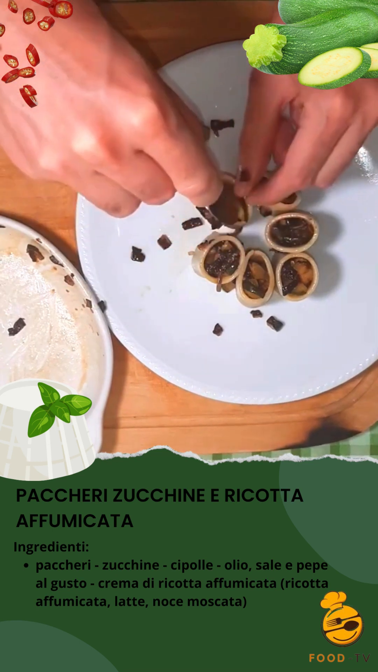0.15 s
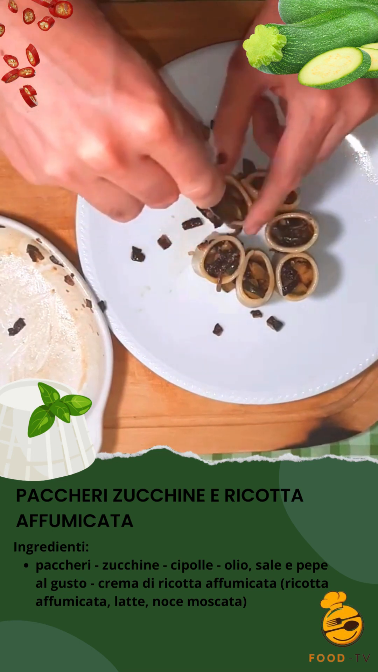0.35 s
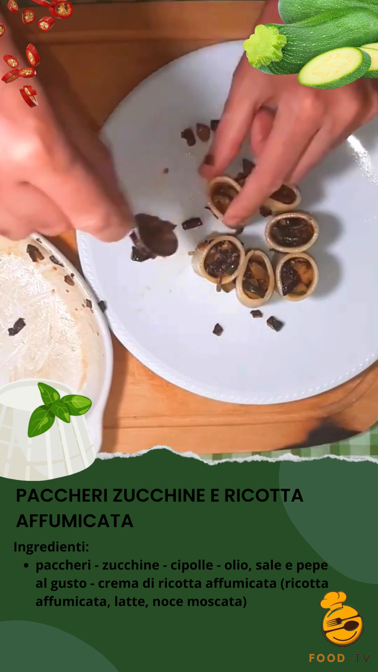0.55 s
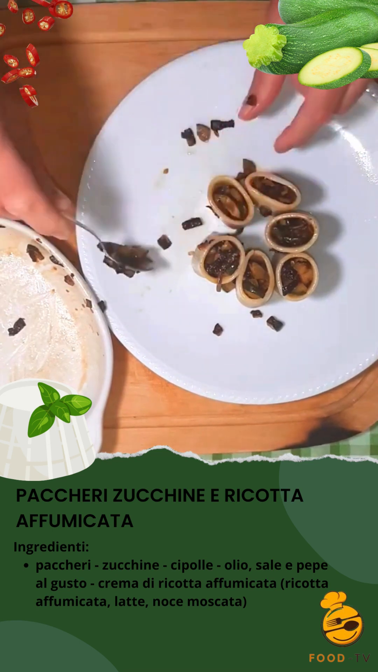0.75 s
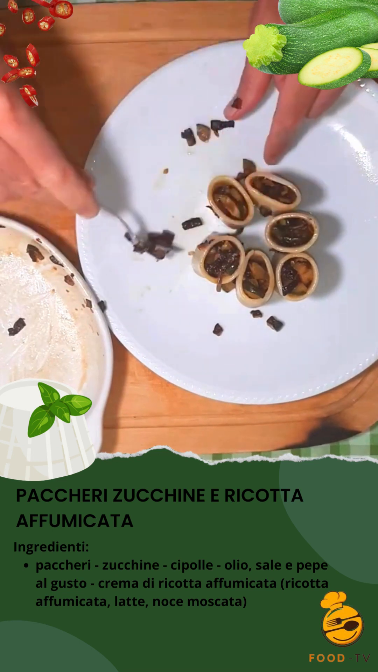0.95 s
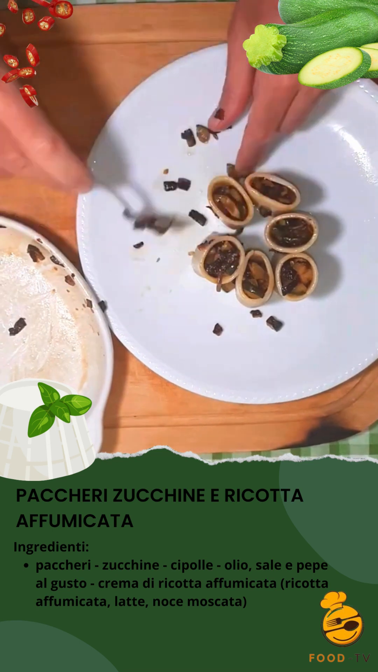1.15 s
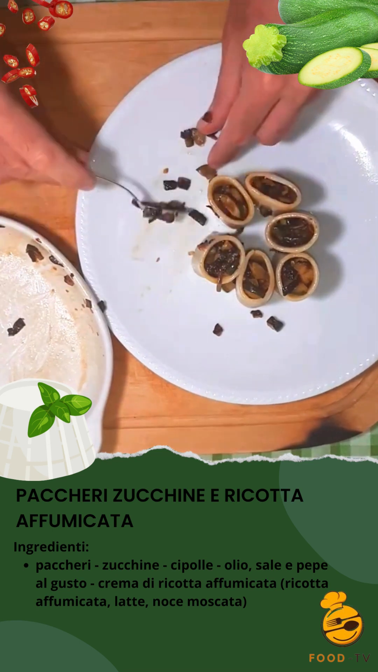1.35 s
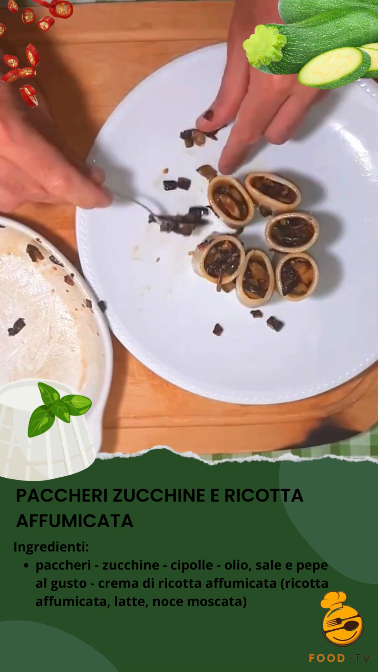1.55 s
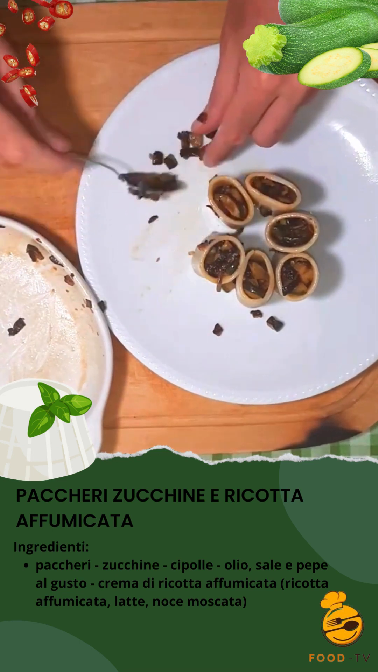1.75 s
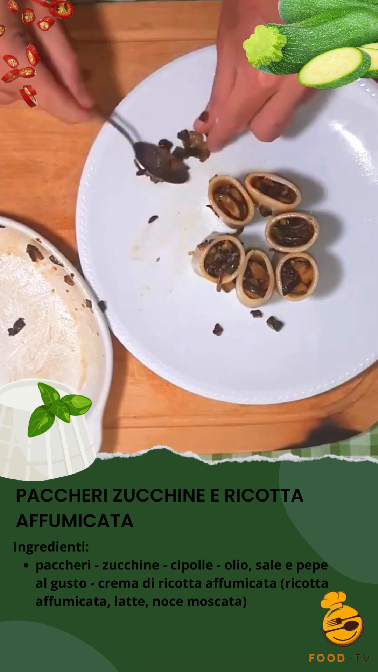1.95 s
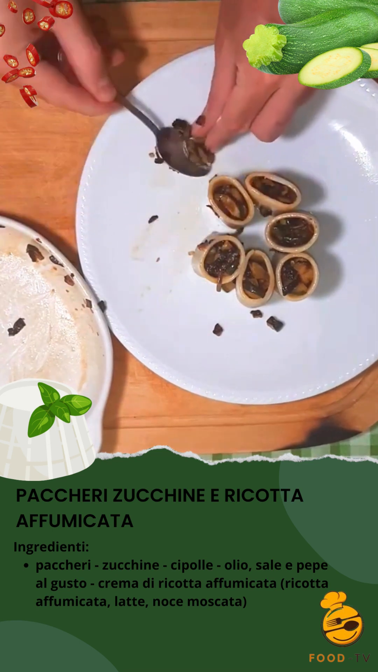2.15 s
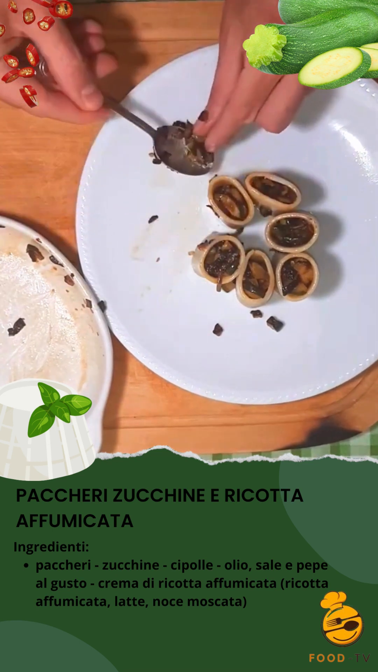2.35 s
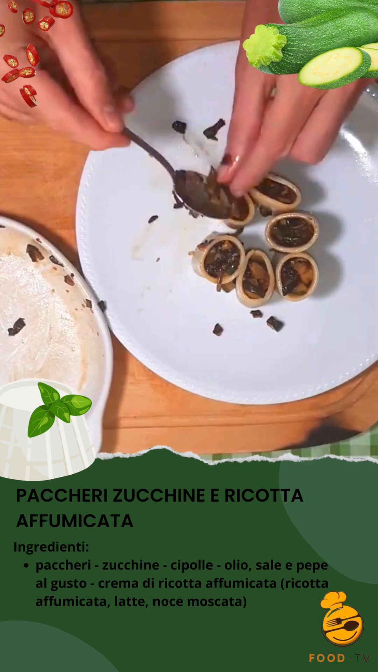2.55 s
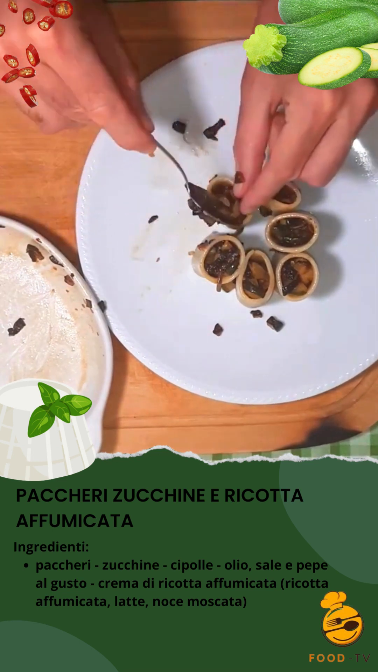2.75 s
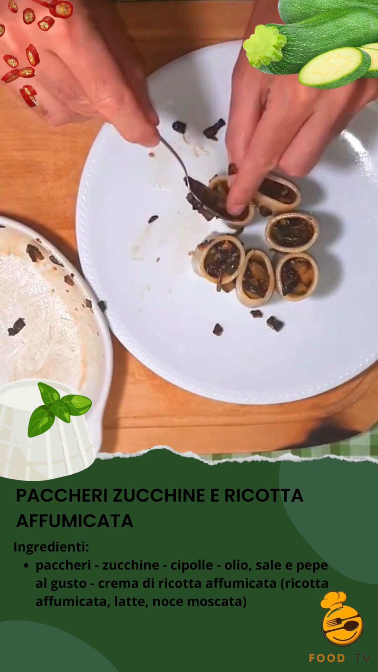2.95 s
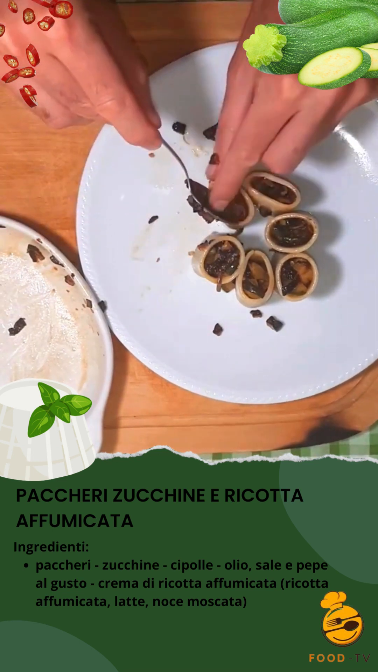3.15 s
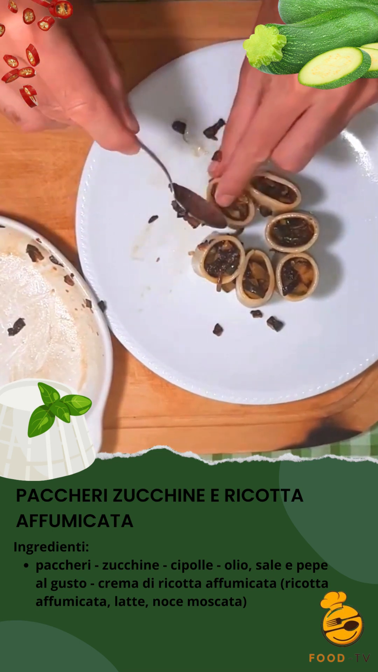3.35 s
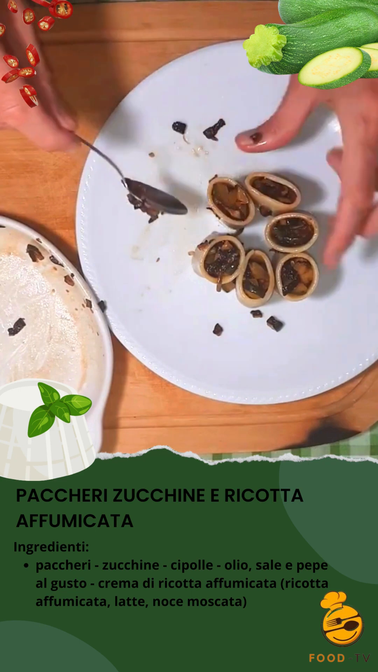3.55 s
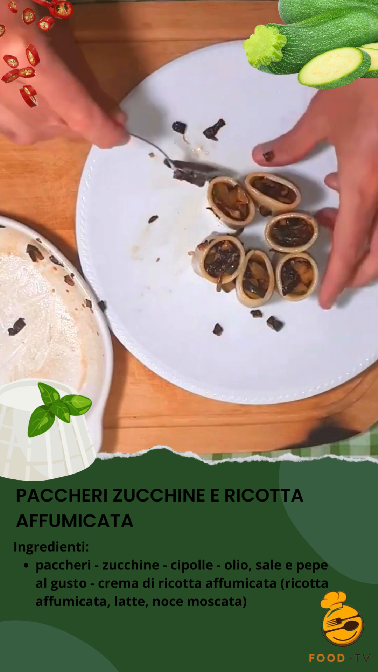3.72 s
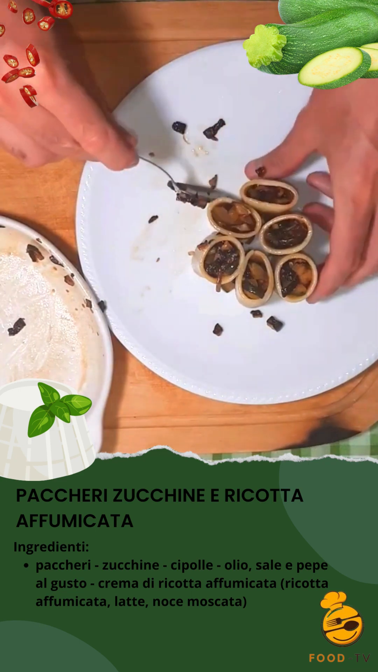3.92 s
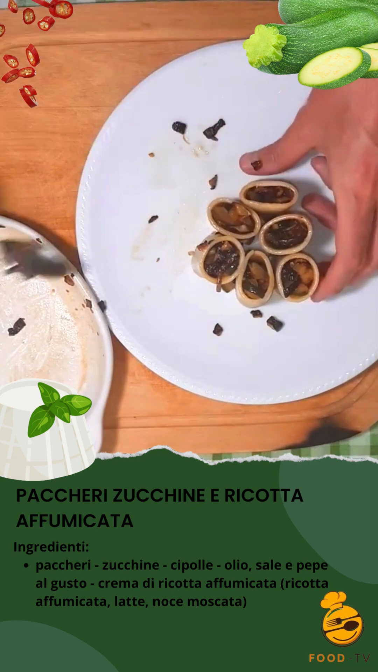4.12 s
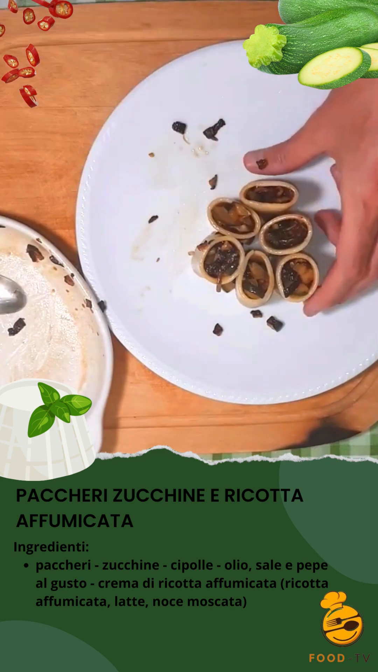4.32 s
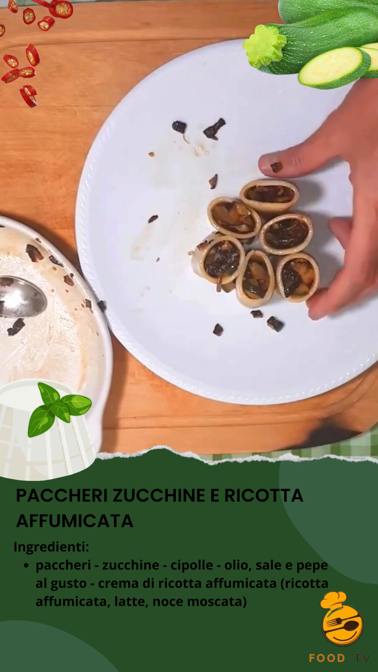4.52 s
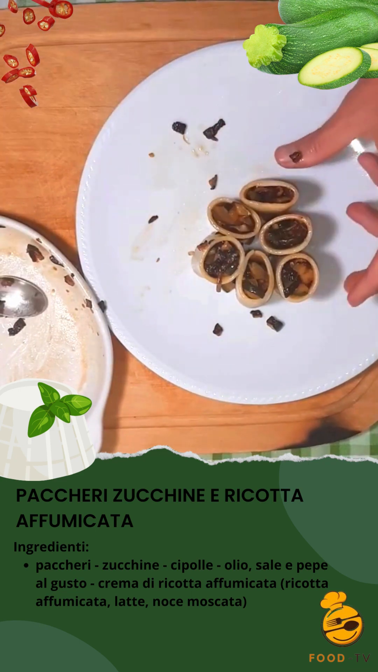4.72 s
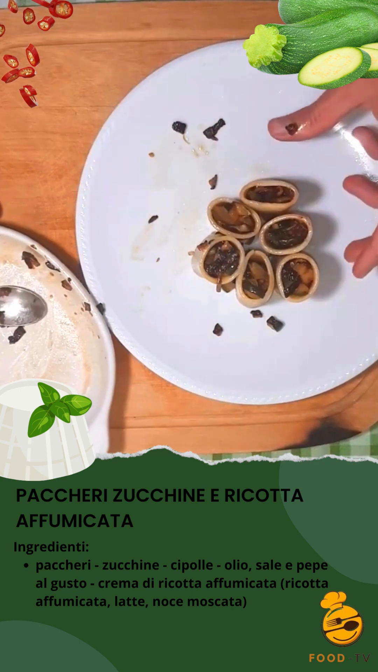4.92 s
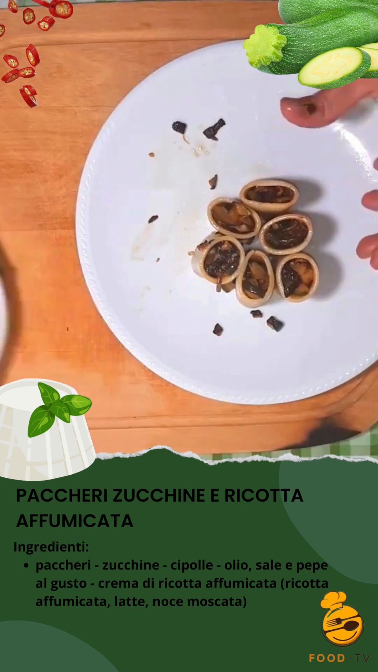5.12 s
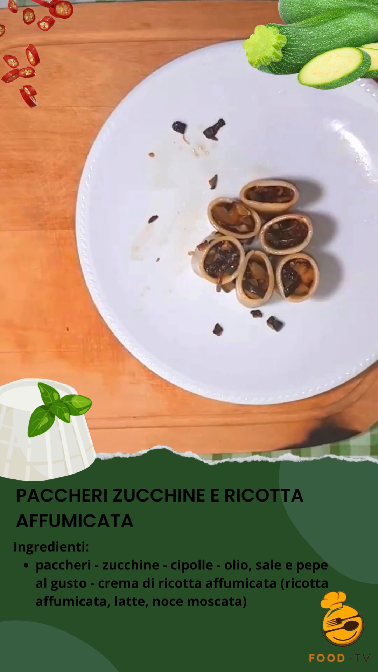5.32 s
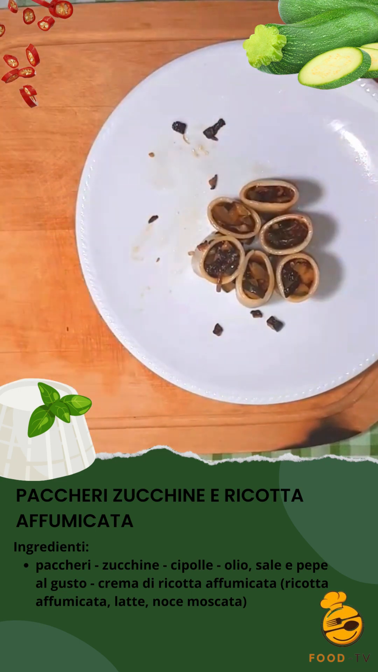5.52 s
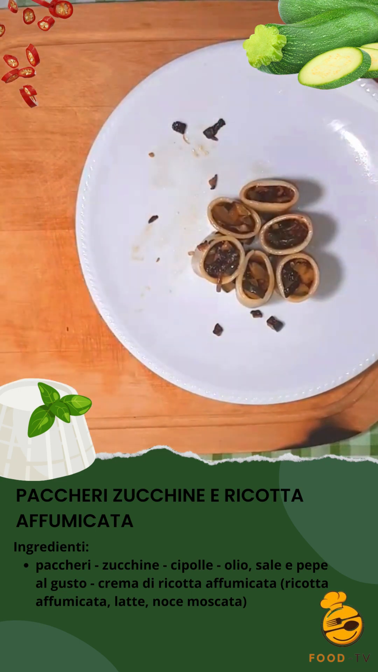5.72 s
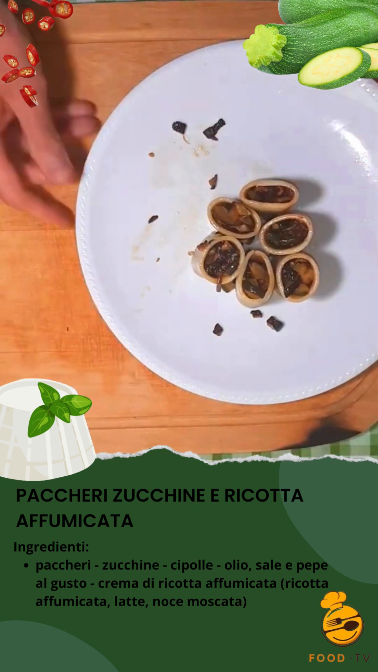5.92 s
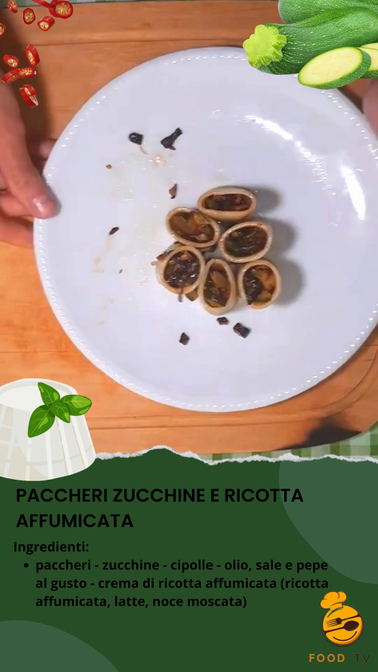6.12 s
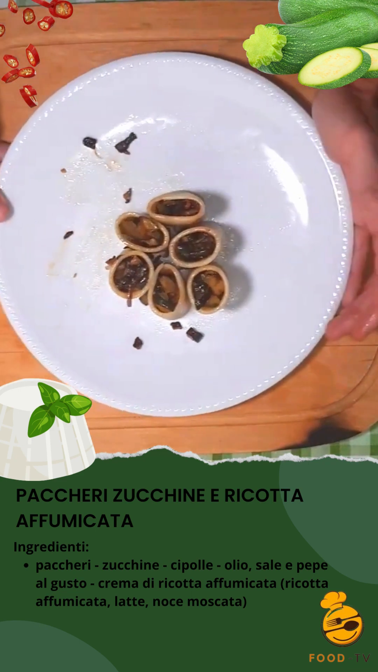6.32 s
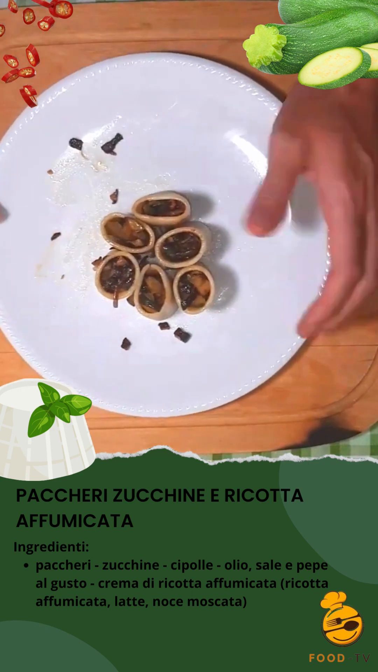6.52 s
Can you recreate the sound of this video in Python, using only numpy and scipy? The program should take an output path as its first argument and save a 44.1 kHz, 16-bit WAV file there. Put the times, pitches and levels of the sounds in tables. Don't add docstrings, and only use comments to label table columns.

```python
import sys
import numpy as np
from scipy import signal
from scipy.fft import rfft, irfft, next_fast_len
from scipy.io import wavfile
from scipy.ndimage import uniform_filter1d

SR = 44100
rng = np.random.default_rng(int(sys.argv[2]) if len(sys.argv) > 2 else 0)


def boost(x):
    u = np.asarray(x, float) / 20
    return 10 ** u


def log_audio(samples):
    frames = np.atleast_2d(samples).T
    limited = np.clip(frames, -1, 1)
    pcm = np.round(limited * 32767).astype(np.int16)
    wavfile.write(sys.argv[1], SR, pcm)


N = 294279

# t/s, crack level/dB, crack t60/s, ring level/dB
TAPS = [
    (1.047, -24, 0.017, -2),
    (1.327, -12.5, 0.022, -2.5),
    (1.561, -14.5, 0.048, -2.5),
    (1.864, -19.5, 0.1, -3),
]
# f/Hz, t60/s, then level/dB for each of the four spots struck
PLATE_MODES = [(597, 0.18, -49, -43.5, -57, -48), (885, 0.12, -51.5, -38, -47, -41),
               (1168, 0.16, -54.5, -49.5, -61, -39.5), (1355, 0.21, -54, -35.5, -49.5, -37.5),
               (1630, 0.26, -57.5, -41, -52, -47), (1940, 0.082, -51, -41.5, -36, -43.5),
               (2160, 0.17, -61.5, -54, -44, -48), (2900, 0.2, -49, -38, -41, -41.5),
               (3930, 0.16, -63, -40.5, -51.5, -65), (4250, 0.082, -40.5, -48, -40, -65),
               (4940, 0.093, -69.5, -40, -59, -54), (5230, 0.14, -71, -37, -45, -39),
               (5760, 0.13, -59, -30, -50, -37.5), (3150, .12, -56, -62, -61, -62),
               (3595, 0.079, -59, -58, -71, -75), (4450, .12, -75.5, -52, -60, -70)]
SPOON_MODES = [(5850, 0.11, -46, -63, -42.5, -60), (6150, 0.17, -58, -37.5, -68, -55),
               (6570, 0.26, -61.5, -56, -42, -52), (6720, .15, -51, -44, -39, -44),
               (6770, 0.29, -66, -37, -41.5, -44.5), (7520, 0.26, -60.5, -43.5, -52, -45.5),
               (9180, 0.87, -67.5, -56, -60.5, -118), (9980, 0.22, -80.5, -59, -63.5, -53.5),
               (10930, 0.1, -57.5, -42.5, -52, -44.5), (11300, 0.27, -65.5, -52, -53, -49.5),
               (12130, 0.24, -81, -49, -109, -53.5), (13200, 0.2, -74.5, -54, -107, -60),
               (13610, 0.22, -72, -109, -54.5, -51), (14900, 0.2, -119, -120, -119, -57)]
DROP = [
    (4.374, -14.5, 0.35, -3),
]
# f/Hz, level/dB
CRACK = [(180, -50), (300, -11), (1390, -1.5), (2030, -12), (2400, -12.5), (2930, -4), (3350, -14.5),
         (5800, -4.5), (6960, -8.5), (8000, -38.5), (9300, -43), (10200, -30), (11300, -16.5), (14000, -36),
         (16000, -48)]


def plate_taps():
    out = np.zeros(N + SR)
    hz, t60, *spots = np.transpose(PLATE_MODES + SPOON_MODES)
    for (s, db, crack_t60, ring_db), spot_db in zip(TAPS, spots):
        add(out, s, hz, spot_db + ring_db + 5.0, t60, rough=0.45, punch=1.24, rocks=60)
    return out[:N] + cracks(TAPS, CRACK)


def plate_scrapes():
    # lifts at t/s, squeal level/dB, hiss level/dB, first pitch f/Hz, last pitch f/Hz
    scrapes = [
        (1.127, -40, -41, 1935, 1996),
        (1.449, -37, -41.5, 2191, 1910),
        (1.739, -40.5, -37.5, 2153, 1940),
        (1.93, -49, -40, 1955, 2047),
    ]
    # t/s, f/Hz, level/dB,
    # t60/s
    catches = [(1.07, 1950, -44, .08), (1.092, 1994, -37, 0.087), (1.352, 1360, -42, .2),
               (1.355, 2120, -37, .15), (1.393, 1995, -33, .1), (1.422, 1974, -39, 0.073),
               (1.445, 2856, -42, .08), (1.452, 1916, -38, .08), (1.475, 1920, -36, .08),
               (1.648, 2180, -30, .08), (1.652, 1946, -35, .08), (1.677, 1953, -25, 0.07),
               (1.697, 2847, -41.5, .15), (1.71, 1942, -31, 0.096), (1.885, 1355, -40, 0.41),
               (1.875, 2932, -44, 0.2), (4.92, 2108, -51, .36)]
    lands_s, squeal_rise_s, hiss_sag_db_s, lift_db_s = 0.012, 0.012, 72.5, 313
    hz, t60, *spots = np.transpose(PLATE_MODES + SPOON_MODES)

    def gap(f):
        return 1 - np.exp(-((f - 8650) / 1000) ** 4)

    hisses, load, pitch = 0, 0, []
    for (s, *_), spot_db, (lift, squeal_db, hiss_db, *ends_hz) in zip(TAPS, spots, scrapes):
        modes = [(c, 40 + 0.005 * c, db + 20 * np.log10(ring / 0.15))
                 for c, db, ring in zip(hz, spot_db, t60) if c > 800]
        start = s + lands_s
        gain = stroke(start, hiss_db, lands_s, lift_db_s, lift - start, hiss_sag_db_s)
        hisses = hisses + gain * grit(lambda f: resonant(modes)(f) * gap(f), spiky_db=7.0)
        start += squeal_rise_s
        load = load + stroke(start, squeal_db, squeal_rise_s, lift_db_s, max(lift - start, 0))
        pitch += zip([s, lift], ends_hz)
    turns = np.cumsum(np.interp(np.arange(N) / SR, *np.transpose(pitch))) / SR
    slips = knots(N, 200, rows=2)
    squeal = unit(np.imag((slips[0] + 1j * slips[1]) * np.exp(2j * np.pi * turns)))
    flares = pings(catches, rough=0.35, attack=0.0045)
    return boost(-4.5) * hisses + boost(-4.0) * load * squeal + flares


def dish_drop():
    dish_hz = [480, 570, 1270, 1640, 2220, 2928, 3342, 3399, 3470, 3560, 3820, 4010, 4140, 4430, 4865, 5142,
               5209, 5274, 5360, 5631, 5771, 6180, 6775, 7146, 7691, 8085, 8186, 8960, 9330, 9447, 10200,
               10906, 11410, 11831, 12150, 12413, 12930, 13960]
    # level/dB, t60/s
    dish_ring = [(-29, .25), (-25, .25), (-15, 0.25), (-27, 0.17), (-31.5, .15), (-21.5, 0.22), (-11, .15),
                 (-14.5, .26), (-16.5, .15), (-21.5, .15), (-21, .16), (-25, 0.17), (-25, .16),
                 (-28.5, .16), (-7.5, .26), (-8, .2), (-4.5, .2), (-6.5, 0.22), (-13, .2), (-3.5, .17),
                 (-18, 0.2), (-18.5, .2), (-11.5, .22), (-3.5, 0.22), (-2.5, 0.2), (-14, .15), (-11.5, .17),
                 (-20, .2), (-18, .16), (-15, .18), (-21.5, .15), (-13.5, 0.22), (-13, 0.29), (-12, .2),
                 (-14.5, .18), (-15, 0.2), (-12.5, 0.27), (-24.5, .2)]
    # f/Hz, level/dB
    clang = [(180, -57.5), (300, -26.5), (1140, -24), (2500, -19.5), (2980, -20.5), (3400, -3), (4250, -22),
             (5080, -4.5), (6100, -8), (7950, -8), (8600, -19.5), (9400, -6.5), (9800, -57), (10600, -56),
             (10900, -12.5), (12400, -11), (13100, -54), (16000, -68.5)]
    modes = np.c_[dish_hz, dish_ring]
    return blows(DROP, modes, rough=0.4, punch=0, spread_db=0, rocks=50) + cracks(DROP, clang)


def spoon_roll():
    lift = [
        (4.8988, -32, 0.043, -11),
    ]
    # f/Hz, level/dB, t60/s
    held = [(1280, 1, 0.089), (1616, -3.5, .12), (1970, 1, 0.08), (2108, 1.5, 0.3), (2950, 1.5, 0.088),
            (3860, -9.5, 0.085), (4592, -12, 0.3), (5000, -7.5, 0.087), (6121, -22, .12), (6740, -9, 0.12),
            (7240, -15, 0.074), (9440, -24, 0.15), (12480, -27, .1), (12960, -30, .12)]
    return blows(lift, held, rough=0.44, punch=2.26, spread_db=0.5) + cracks(lift, CRACK)


def spoon_rattle():
    rattle = [
        (5.093, -52, 0.03, -8),
        (5.149, -54, .03, -5),
        (5.157, -43, 0.03, -9),
        (5.211, -47.5, 0.04, -3.5),
        (5.255, -59, .03, -6),
    ]
    tips = [
        (5.312, -36, 0.026, -4),
    ]
    buzz = [
        (5.507, -46.5, .025, -6),
        (5.517, -41.5, .025, -0.5),
        (5.526, -41.5, .025, -3.5),
        (5.535, -45, .02, -5),
        (5.558, -49, .04, -8),
    ]
    # f/Hz, t60/s, level/dB in rattle, in tip, in chatter
    loose = [(2794, 0.086, -4, -15, -14), (3210, 0.067, -16, -12, -10), (3480, .07, -8, -26, -23),
             (4560, 0.25, -14, -5, -7), (4820, 0.089, -9, -24, -11), (6670, 0.063, 0, -0.5, 0),
             (7970, .1, -22, -21, -26), (9340, .08, -14, -15, -11), (10220, .1, -16, -17, -15),
             (11650, .1, -15, -14, -14), (11830, 0.12, -14, -9, -14), (12850, 0.11, -14, -20, -11),
             (13150, .1, -22, -13, -24), (13920, .1, -22, -26, -28)]
    # t/s, f/Hz, level/dB, t60/s
    ticks = [(5.093, 2950, -41, 0.054), (5.093, 3450, -43, .03), (5.093, 6700, -52, .04),
             (5.149, 3070, -51, .04), (5.158, 4970, -47, .03), (5.159, 6720, -50, .05),
             (5.168, 2800, -52, 0.11), (5.217, 3440, -56, .1)]
    hz, t60, *poses = np.transpose(loose)
    out = cracks(rattle + tips + buzz, CRACK) + pings(ticks, rough=0.5, attack=0.001)
    for events, pose_db in zip([rattle, tips, buzz], poses):
        modes = list(zip(hz, pose_db, t60))
        out += blows(events, modes, rough=0.71, punch=0.81, spread_db=3.0, rocks=87)
    return out


def spoon_skids():
    # t/s, level/dB, fade/(dB/s), held/s
    slither = [(4.878, -53, 200, 0.0015), (4.904, -43.5, 270, 0.0022), (5.099, -52.5, 300, 0.0037),
               (5.16, -53, 73, 0), (5.215, -61, 200, 0.0047), (5.315, -43, 504, 0.0099),
               (5.36, -63, 200, 0), (5.511, -41.5, 900, 0.017), (5.561, -56.5, 298, 0.0018)]
    # f/Hz, level/dB
    slide = [(1060, -39), (1800, -3.5), (3560, -0.5), (4040, -11), (4780, 0.5), (6290, -10.5), (6810, -4),
             (7510, -13), (11700, -19), (15000, -18)]
    # f/Hz, width/Hz, level/dB
    rim = [(2930, 200, -5), (4760, 53, -6), (6620, 120, 2), (11740, 150, -1.5), (12850, 100, -7)]
    skids = [stroke(s, db, 0.011, fade, held) for s, db, fade, held in slither]
    hiss = sum(skids) * grit(lambda hz: boost(along(slide, hz)), spiky_db=5.0)
    ringing = sum(skids[2:]) * grit(resonant(rim), spiky_db=-4.0)
    return boost(-4.0) * hiss + boost(-8.5) * ringing


def board_knocks():
    # t/s, peak level/dB, level/dB near 150 Hz, level/dB near 1 kHz
    knock_events = [(0.28, -52, -21, 4.5), (0.842, -51.5, 12.5, -27), (4.372, -38.5, -1, 4.5),
                    (4.81, -55, -3.5, -23), (4.897, -37.5, -19.5, -7), (5.07, -57, 12, -23),
                    (5.086, -37, -15, -5.5), (5.198, -39.5, -12, -8), (5.3163, -24.5, -20, -15),
                    (5.307, -18.5, -25, -4), (5.5, -56, 9, -20), (5.943, -44.5, -23, -15),
                    (6.088, -44.5, -11.5, -30)]
    # f/Hz, level/dB, t60/s
    wood = [(89.6, 3.5, 0.14), (143.5, -0.5, 0.19), (198, -0.5, 0.19), (284, -0.5, 0.15), (458, -7, 0.079),
            (597, 2, 0.055), (755, -7, 0.04), (947, 0.5, 0.06), (1190, 3, 0.046), (1400, -4, 0.033),
            (1580, -9, 0.07)]
    out = np.zeros(N + SR)
    hz, mode_db, t60 = np.transpose(wood)
    for s, db, low_db, high_db in knock_events:
        tilt_db = np.interp(hz, [182, 300.0, 590, 882], [low_db, 0, 0, high_db])
        add(out, s, hz, mode_db + db - 5.5 + tilt_db, t60,
            rough=0.38, punch=1.9, attack=0.0047, size=SR // 6)
    return out[:N]


def plate_drag():
    # t/s, level/dB, overtones level/dB
    slips = [(6.093, -37.5, 11.5), (6.13, -43, 1.5), (6.157, -32, 5), (6.178, -32.5, 8), (6.2, -38, 9),
             (6.223, -30.5, 13), (6.262, -34.5, 12), (6.289, -27.5, 1), (6.305, -36, -1), (6.345, -39, 6),
             (6.405, -42, 4), (6.462, -43, -2)]
    # t/s, level/dB
    push = [
        (5.8, -67),
        (6.075, -55),
        (6.095, -55),
        (6.16, -36.5),
        (6.24, -32.5),
        (6.31, -41),
        (6.46, -45.5),
        (6.62, -77),
    ]
    # t/s, level/dB, brightness/dB
    nudge_events = [(4.825, -46, -26), (4.904, -45.5, -0.5), (5.097, -41.5, -19), (5.227, -41, -7.5),
                    (5.31, -45, 8.5), (5.51, -52, -31), (5.564, -63, 11), (5.849, -66, 11.5),
                    (5.93, -64, 4), (6.0, -62, 7), (6.045, -69, 7.5)]
    # f/Hz, width/Hz, level/dB
    board = [(142.5, 19.6, 7.5), (287.6, 40, 0.5), (436, 166, -13)]
    # f/Hz, level/dB
    grain = [(210, -32), (350, -6), (583, -5.5), (777, -12), (887, -8.5), (1970, -21), (2500, -27.5),
             (3250, -68), (5500, -120)]
    # f/Hz, width/Hz, level/dB
    song_modes = [(2390, 30, -11), (2840, 50, 1), (3540, 62, -8), (4120, 45, 1), (5160, 46, -7),
                  (5730, 41, 3), (6590, 68, -12), (6750, 42, -13), (7480, 32, -13), (11000, 180, -16),
                  (13600, 110, -20), (14200, 50, -14)]

    jolts = np.zeros(N + SR)
    hz, width, mode_db = np.transpose(board)
    for s, db, over_db in slips:
        add(jolts, s, hz, mode_db + db - 5.5 + over_db * (hz > hz[0]), 2.33 / width,
            rough=0.21, punch=0.3, attack=0.003, size=SR // 6)

    push_db = np.interp(np.arange(N) / SR, *np.transpose(push), -140, -140)
    swing_db = push_db + 35.5
    nudges = [(stroke(s, db, 0.022, 216), boost(bright_db)) for s, db, bright_db in nudge_events]
    rumble_gain = boost(push_db - 5) + sum(gain for gain, bright in nudges)
    rumble = rumble_gain * boost(2.0) * grit(resonant(board), spiky_db=2.5, bumps=60)
    rasp_gain = boost(-46 + swing_db) + sum(gain * bright for gain, bright in nudges)
    rasp = rasp_gain * grit(lambda hz: boost(along(grain, hz)), spiky_db=4.0)
    choke_db = 2 * np.maximum(-56 - push_db, 0)
    song_gain = boost(-59.5 + 0.68 * swing_db - choke_db)
    song = song_gain * grit(resonant(song_modes), spiky_db=3.5, bumps=45)
    return jolts[:N] + rumble + rasp + song


def fingers():
    # t/s, level/dB, fade/(dB/s)
    brushes = [
        (5.86, -66, 90),
        (5.949, -57, 88),
    ]
    # t/s, f/Hz, level/dB, t60/s
    touches = [(5.665, 1288, -46, 0.11), (5.672, 3480, -55, .06), (6.128, 2846, -53.5, .2),
               (5.83, 899, -47, 0.11), (5.86, 1850, -54, .1), (5.942, 613, -44, .06),
               (6.03, 1020, -48, 0.14)]
    gain = sum(stroke(s, db - 6.0, 0.044, fade) for s, db, fade in brushes)
    brush = gain * grit(lambda hz: boost(along(CRACK, hz)), spiky_db=3.0)
    return brush + pings(touches, rough=0.98, attack=0.0057)


def kitchen(x):
    # f/Hz, t60/s
    decay = [(200, 0.6), (1000, 0.34), (4000, 0.39), (8000, 0.24), (14000, 0.16)]
    hz, t, z = signal.stft(rng.standard_normal((2, SR // 2)), SR, nperseg=256)
    z[1] *= np.clip(hz / 700, 0, 1)[:, None]
    fade = boost(-60 * t / along(decay, hz)[:, None])
    mid, side = signal.istft(z * fade, SR, nperseg=256)[1]
    tail = np.array([mid + side, mid - side]) / np.linalg.norm(mid + side)
    return signal.fftconvolve(np.pad(x, (200, 0))[None], tail, axes=1)[:, :N]


def extractor():
    # f/Hz, level/dB
    body = [(12, -60), (20, -24.5), (43, -22.5), (80, -4), (108, -1.5), (136, -2), (166, -9), (313, -10),
            (376, -6.5), (848, -11.5), (939, -13.5), (1410, -17.5), (1590, -13.5), (2120, -31.5),
            (2600, -41), (3380, -68), (5720, -120)]
    # f/Hz, level/dB
    air = [(1290, -38.5), (2200, -11), (2870, -7.5), (3510, -1.5), (4070, 0.5), (4430, -4.5), (4850, 1.5),
           (5830, -4.5), (7000, -1), (8270, -13), (15100, -11), (16100, -14.5)]
    # f/Hz, width/Hz
    duct = [(113, 50), (344, 42), (953, 17), (1210, 110), (1590, 54)]

    def lift(hz):
        return 1.5 + sum(0.94 / (1 + (2 * (hz - c) / w) ** 2) for c, w in duct)

    hum = rush(lambda hz: boost(along(body, hz)) * lift(hz), patchy_db=2.5)
    hiss = rush(lambda hz: boost(along(air, hz)), patchy_db=2.5)
    return boost(-57) * hum + boost(-73) * hiss


def rush(colour, patchy_db):
    # f/Hz, likeness (0 to 1)
    alike = [(60, 0.98), (130, 1), (290, .7), (640, 0.6), (1410, 0.038), (3100, 0), (6800, .1), (7600, .6),
             (8300, 0.98), (16000, 1)]
    # f/Hz, left-right level/dB
    lean = [(60, -2), (200, 1.5), (380, -11), (700, -4), (1290, -8.5), (2380, -4), (4400, 6.5), (7000, -2),
            (8300, -4), (16000, -2.5)]
    # f/Hz, phase/rad
    lead = [(0, 1.5), (130, -2.07), (430, 0.24), (1120, 4), (1380, 3.5), (1640, 5.5), (2500, 0),
            (3620, -0.5), (4740, -4), (5000, -8), (6460, -1), (7600, -0.5), (16300, 1)]
    z = signal.stft(rng.standard_normal((2, N)), nperseg=512)[2]
    field = uniform_filter1d(rng.standard_normal(z.shape[1:]), size=5, axis=0)
    field = uniform_filter1d(field, size=10, axis=1)
    pair = signal.istft(z * boost(patchy_db * unit(field)), nperseg=512)[1][:, :N]

    def shares(hz):
        turn = np.arccos(np.clip(along(alike, hz), -1, 1)) / 2
        return colour(hz) * np.array([np.cos(turn), np.sin(turn)])

    a, b = filtered(pair, shares)
    both = ports(np.array([a + b, a - b]), lean, lead)
    return both / np.sqrt(np.mean(both.mean(axis=0) ** 2))


def ports(pair, lean, lead):
    side = np.array([[0.5], [-0.5]])

    def response(hz):
        phase = side * np.interp(hz, *np.transpose(lead))
        return boost(side * along(lean, hz)) * np.exp(1j * phase)

    return filtered(pair, response)


def blows(events, modes, rough, punch, spread_db, rocks=90):
    out = np.zeros(N + SR)
    hz, mode_db, t60 = np.transpose(modes)
    for s, db, crack_t60, ring_db in events:
        level_db = mode_db + db + ring_db + rng.normal(0, spread_db, len(hz))
        add(out, s, hz, level_db, t60, rough, punch, rocks=rocks)
    return out[:N]


def pings(rows, rough, attack):
    out = np.zeros(N + SR)
    for s, hz, db, t60 in rows:
        add(out, s, [hz], [db], [t60], rough, 0, attack, size=SR // 6)
    return out[:N]


def add(out, s, hz, db, t60, rough, punch, attack=0.0005, rocks=90, size=SR // 3):
    t = np.arange(size) / SR
    hz, db, t60 = (np.asarray(v)[:, None] for v in (hz, db, t60))
    wander = knots(len(t), rocks, 2 * len(hz)).reshape(-1, len(hz), len(t))
    blur = rough * (1 - np.exp(-t / 0.022)) * wander
    start = (hz > 2500) * rng.random(hz.shape)
    phase = (2 * np.pi * (hz * t + start)).astype(np.float32)
    fade = boost(db - 60 * t / np.clip(t60, 0.01, 0.36))
    lines = fade * ((1 + blur[0]) * np.sin(phase) + blur[1] * np.cos(phase))
    press = (1 - np.exp(-t / attack)) * (1 + punch * np.exp(-(t / 0.012) ** 2))
    out[round(s * SR):][:len(t)] += lines.sum(axis=0) * press


def cracks(events, colour):
    gain, t = np.zeros(N + SR), np.arange(SR // 4) / SR
    for s, db, t60, ring_db in events:
        fade_db = 60 * np.maximum(t - 0.005, 0) / max(t60, 0.005)
        gain[round(s * SR):][:len(t)] += boost(db - 12.5 - fade_db)
    noise = filtered(rng.standard_normal(N), lambda hz: boost(along(colour, hz)))
    return gain[:N] * unit(noise)


def grit(response, spiky_db, bumps=220):
    bumpy = boost(spiky_db * knots(N, bumps)[0])
    return unit(filtered(bumpy * rng.standard_normal(N), response))


def stroke(s, db, rise_s, fade_db_s, hold_s=0, sag_db_s=0):
    t = np.arange(0, N + 32, 32) / SR - s
    rise_db = 30 * np.minimum(t, 0) / rise_s
    fall_db = sag_db_s * np.clip(t, 0, hold_s) + fade_db_s * np.maximum(t - hold_s, 0)
    return np.interp(np.arange(N) / 32, np.arange(len(t)), boost(db + rise_db - fall_db))


def knots(count, rate, rows=1):
    at = np.arange(count) * rate / SR
    points = rng.standard_normal((rows, int(at[-1]) + 2))
    return np.array([np.interp(at, np.arange(len(k)), k) for k in points])


def resonant(peaks):
    def response(hz):
        f = hz[::16]
        total = 0
        for k, (c, w, db) in enumerate(peaks):
            total = total + (-1) ** k * boost(db) * 1j * f * w / (c * c - f * f + 1j * f * w)
        return np.interp(hz, f, total)
    return response


def causal(points):
    def response(hz):
        cepstrum = irfft(np.log(boost(along(points, hz)) + 1e-6))
        cepstrum[1:len(hz) - 1] *= 2
        cepstrum[len(hz):] = 0
        return np.exp(rfft(cepstrum))
    return response


def filtered(x, response):
    m = next_fast_len(N + SR // 2)
    return irfft(rfft(x, m) * response(np.fft.rfftfreq(m, 1 / SR)), m)[..., :N]


def along(points, hz):
    f, v = np.transpose(points)
    return np.interp(np.log(hz + 1), np.log(f + 1), v)


def unit(x):
    return x / np.sqrt(np.mean(x ** 2) + 1e-20)


def scene():
    # f/Hz, level/dB
    capsule = [(20, -13.5), (60, -10.5), (120, -1.5), (7000, -0.5), (8500, 0), (14500, -1.5), (16000, -11),
               (17000, -36.5)]
    # f/Hz, left-right level/dB
    near_lean = [(60, 1.5), (200, -0.5), (380, -4), (700, 0.5), (1290, -11), (2380, 8), (4400, 14.5),
                 (5750, 15), (7600, -3.5), (9500, 1), (15000, 4.5)]
    # f/Hz, phase/rad
    near_lead = [(0, 0), (170, -0.18), (300, 0.68), (860, 1), (1640, 5.5), (2930, 11.5), (4130, 12),
                 (5300, 21), (5750, 23.5), (7600, 27), (9500, 26)]
    plate = plate_taps() + plate_scrapes()
    dish = dish_drop() + spoon_roll() + spoon_rattle() + spoon_skids()
    board = board_knocks() + plate_drag() + fingers()
    table = filtered(plate + dish + board, causal(capsule))
    direct = ports(np.array([table] * 2), near_lean, near_lead)
    return direct + boost(-6.0) * kitchen(table) + extractor()


def starved(x):
    treble_hz, faint_db = 7700, -27.5
    hz, t, z = signal.stft(x, SR, nperseg=2048, noverlap=1024)
    power = uniform_filter1d((np.abs(z) ** 2).mean(axis=0), size=24, axis=0)
    middle = power[(hz > 2000) & (hz < treble_hz)].mean(axis=0)
    whim_db = rng.normal(0, 3, (len(hz) // 20 + 1, len(t)))
    whim_db = np.repeat(whim_db, 20, axis=0)[:len(hz)]
    strong = power > middle * boost(2 * (faint_db + whim_db))
    spared = (hz < treble_hz) | (hz > 15300)
    keep = strong | spared[:, None]
    return signal.istft(z * keep, SR, nperseg=2048, noverlap=1024)[1][:, :N]


def low_pass(x):
    return signal.sosfilt(signal.butter(12, 16750, fs=SR, output="sos"), x)


def record(dry):
    duck_db, sink_s, recover_s = -23, 0.42, 0.46
    t = np.maximum(np.arange(N) / SR - DROP[0][0], 0)
    gain_db = duck_db * (1 - np.exp(-(t / sink_s) ** 2)) * np.exp(-t / recover_s)
    return low_pass(starved(dry * boost(gain_db)))


dry = scene()
out = record(dry)
log_audio(out)
```